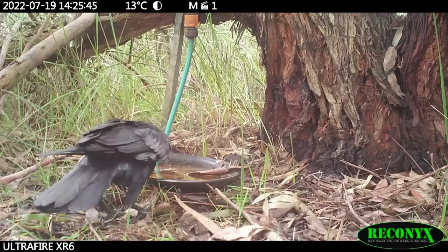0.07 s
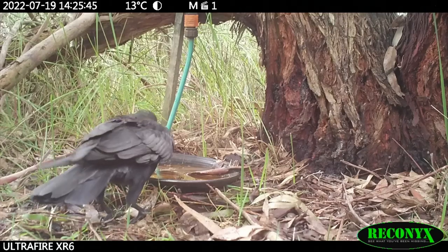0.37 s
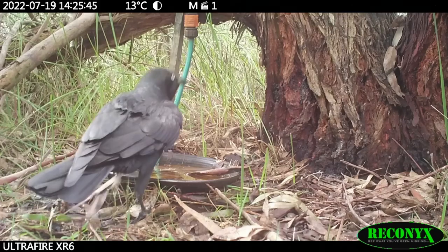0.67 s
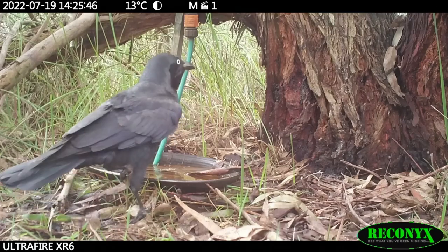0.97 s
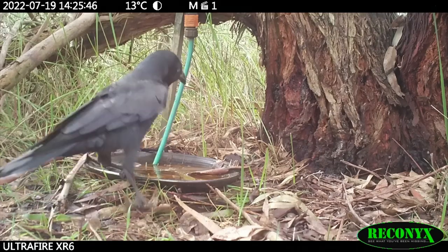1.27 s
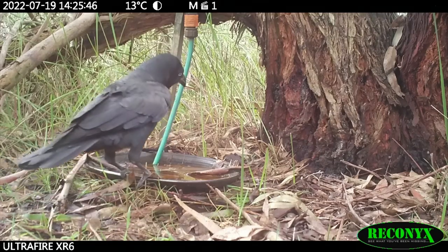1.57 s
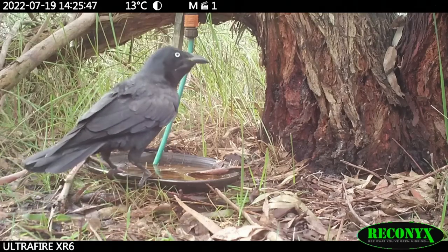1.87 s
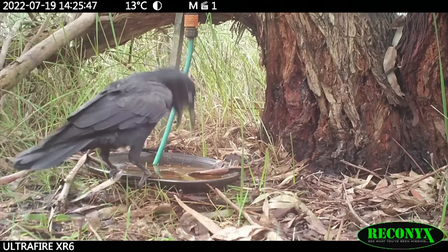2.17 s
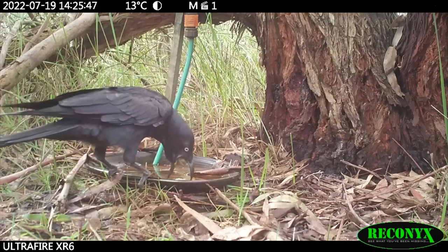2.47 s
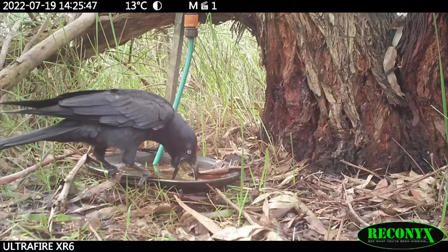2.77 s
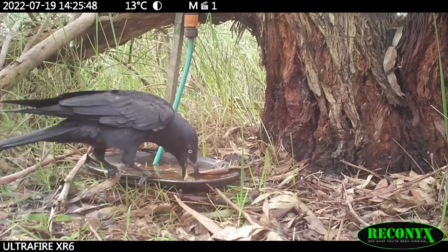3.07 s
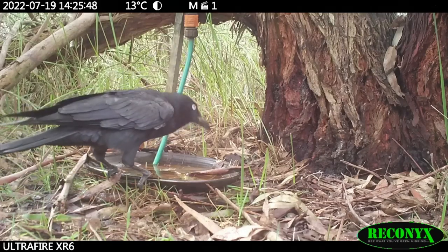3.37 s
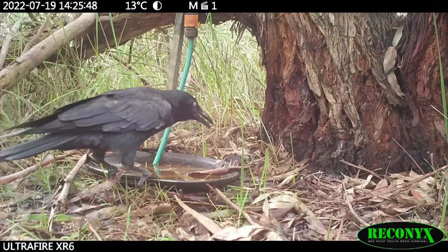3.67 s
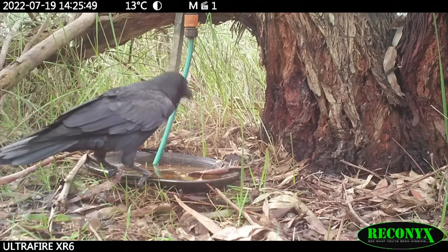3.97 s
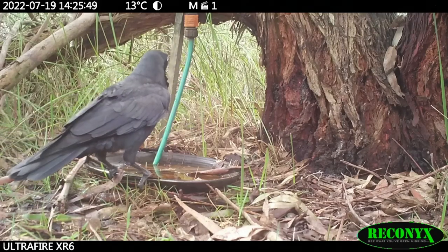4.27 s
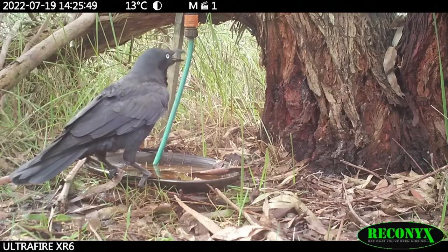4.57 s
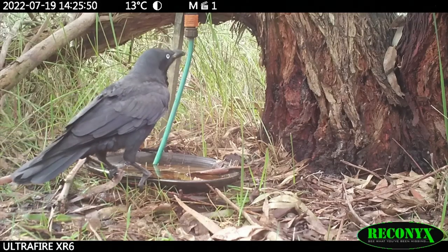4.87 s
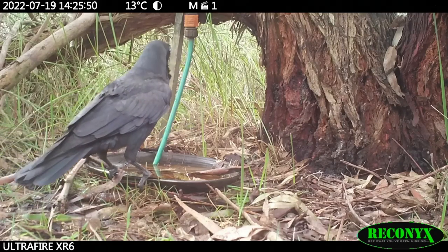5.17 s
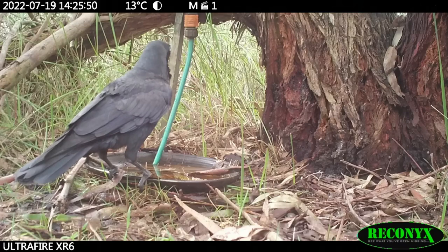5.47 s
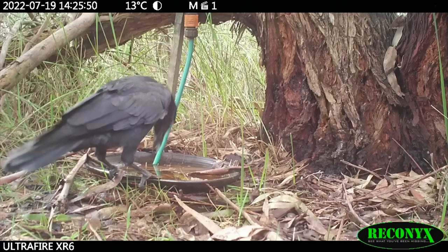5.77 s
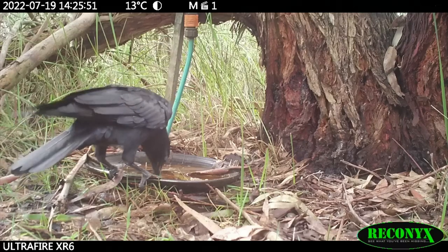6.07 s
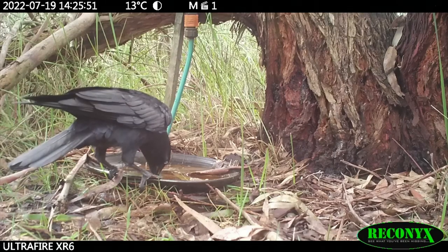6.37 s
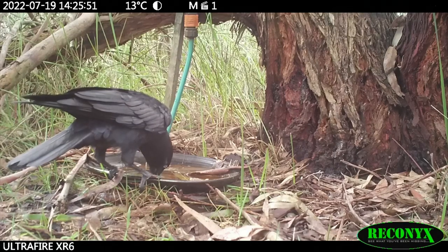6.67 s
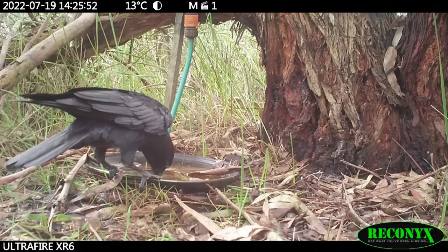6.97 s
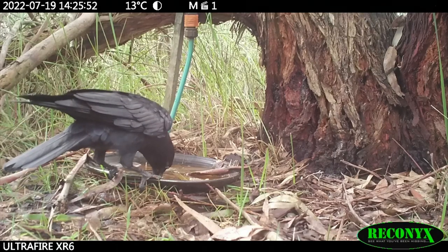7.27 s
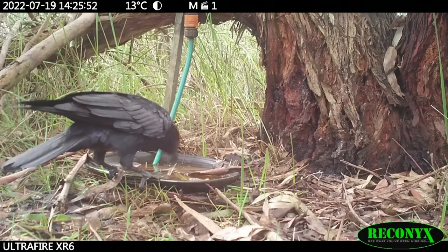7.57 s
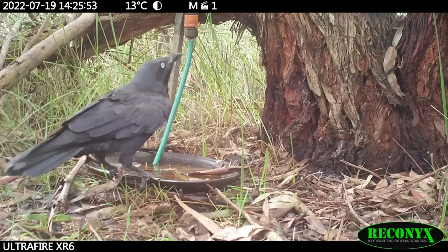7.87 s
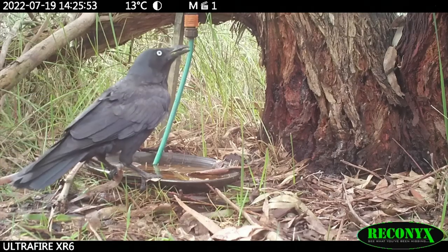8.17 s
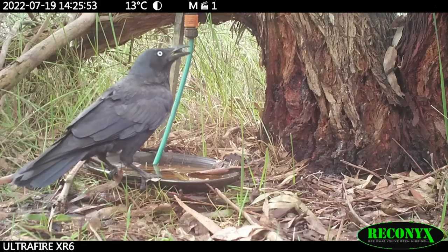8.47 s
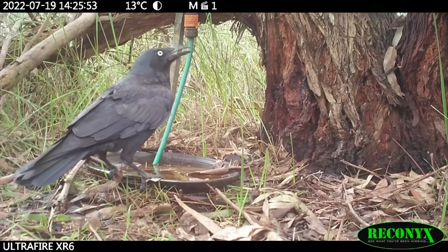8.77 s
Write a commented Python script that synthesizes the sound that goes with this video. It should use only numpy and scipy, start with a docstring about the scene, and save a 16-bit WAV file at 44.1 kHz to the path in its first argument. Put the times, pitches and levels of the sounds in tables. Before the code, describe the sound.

A large bird steps on dry leaves, snaps twigs and ruffles its feathers, while small birds chirp faintly over a soft hiss.

```python
"""Quiet bushland: a raven steps over dry leaf litter onto a water dish and shakes its head.
Twigs snap and leaves crunch in swarms of tiny fractures; claws skid and set the dish ringing.
The shake is a rustle of feathers and a few dull flaps. Small birds whistle and chip among the trees,
their tones scattered by the wood. Near the end, four soft, low stick-slip creaks sound close by.
Microphone hiss and a low rumble of far air lie under it all."""
import sys
import numpy as np
from scipy import signal
from scipy.fft import rfft, irfft, next_fast_len
from scipy.io import wavfile

SR = 44100
rng = np.random.default_rng(int(sys.argv[2]) if len(sys.argv) > 2 else 0)


def dump_mix(stems):
    """Bounce the given channels to the path in sys.argv[1] as a 16-bit WAV at rate SR."""
    frames = np.atleast_2d(stems).T  # one column per channel
    limited = np.clip(frames, -1, 1)  # hard clip at full scale
    pcm = np.round(limited * 32767).astype(np.int16)
    wavfile.write(sys.argv[1], SR, pcm)


N = 397782
TIME = np.arange(N) / SR
FFT_SIZE = next_fast_len(N)
FFT_HZ = np.arange(FFT_SIZE // 2 + 1) * SR / FFT_SIZE
RUSTLE_LIKENESS = 0.59  # left-right correlation of leaves, twigs and feathers


def from_db(db):
    """Amplitude grows tenfold with every 20 dB."""
    return 10 ** (np.asarray(db) / 20)


def at_hz(points, hz):
    """Interpolation of a table on a logarithmic frequency axis."""
    table_hz, values = np.transpose(points)
    return np.interp(np.log(hz + 1e-9), np.log(table_hz), values)


def add(track, s, sound):
    """Superposition: a short sound adds to a track from time s."""
    start = int(round(s * SR))
    part = sound[..., :N - start]
    track[..., start:start + part.shape[-1]] += part


def coloured(x, spectrum):
    """Spectral shaping: a smooth envelope weights the frequencies; the result has rms 1."""
    shaped = irfft(rfft(x, FFT_SIZE) * from_db(at_hz(spectrum, FFT_HZ)), FFT_SIZE)[..., :N]
    return shaped / np.sqrt(np.mean(shaped ** 2) + 1e-20)


def two_ears(shared, own, likeness):
    """Interaural correlation: one part reaches the ears in phase, the other in antiphase."""
    return np.sqrt((1 + likeness) / 2) * shared + np.sqrt((1 - likeness) / 2) * own * [[1], [-1]]


def grains(per_s, spread_db):
    """Shot noise: tiny impulses of uneven size arrive at random."""
    sizes = from_db(spread_db * np.minimum(rng.exponential(1, (2, N)), 4))
    signs = rng.choice([-1, 1], (2, N))
    arrivals = rng.random((2, N)) < per_s / SR
    return two_ears(*(sizes * signs * arrivals), RUSTLE_LIKENESS)


def swell_and_fade(s, db, swell_s, fade_s):
    """Exponential growth to a peak at time s, then exponential decay."""
    exponent = np.minimum((TIME - s) / swell_s, (s - TIME) / fade_s)
    return from_db(db) * np.exp(np.maximum(exponent, -30))


def resonance(x, hz, width_hz):
    """A two-pole resonator passes one band, with unit gain at its peak."""
    r, w = np.exp(-np.pi * width_hz / SR), 2 * np.pi * hz / SR
    return signal.lfilter(np.array([1, 0, -1]) * (1 - r * r) / 2, [1, -2 * r * np.cos(w), r * r], x)


def ring(force, hz, t60):
    """A damped oscillator answers each impulse with a decaying sine."""
    r, w = from_db(-60 / (t60 * SR)), 2 * np.pi * hz / SR
    return signal.lfilter([0, np.sin(w)], [1, -2 * r * np.cos(w), r * r], force + 1e-18)


def strike(modes, soft_hz, vary_db):
    """Modal response to one contact: a soft push gives little to the modes above soft_hz."""
    lowpass = signal.butter(2, soft_hz, fs=SR, output="sos")
    push = signal.sosfilt(lowpass, signal.unit_impulse(SR // 16))
    return sum(ring(push, hz, t60) * from_db(db + vary_db * rng.standard_normal())
               for hz, db, t60 in modes)


def scatter(x, t60, delay_s):
    """Diffuse reverberation: countless reflections, different at each ear, decay exponentially."""
    t = np.arange(int(1.5 * SR)) / SR
    tail = rng.standard_normal((2, len(t))) * from_db(-60 * t / t60) * (t >= delay_s)
    tail /= np.sqrt(np.sum(tail ** 2, axis=1, keepdims=True) + 1e-20)
    return signal.fftconvolve(x[None], tail, axes=1)[:, :N]


def background():
    """Noise floor: far air and microphone hiss, weakly correlated, with a thin electronic whine."""
    # rumble and hiss: (frequency [Hz], relative spectral density [dB])
    spectrum = [(20, -3.5), (35, 1), (65, -5.5), (130, -11), (250, -16.5), (450, -20.5), (700, -23),
                (1400, -26), (3500, -28.5), (5000, -29), (6500, -28.5), (8500, -32.5), (12000, -33),
                (15500, -35.5)]
    # likeness of left and right: (frequency [Hz], correlation [1])
    likeness = [(60, 0.51), (300, 0.18), (1200, 0.26), (3500, 0.027), (7000, 0.12), (14000, 0.14)]
    white = rfft(rng.standard_normal((2, FFT_SIZE)))
    ears = irfft(two_ears(*white, at_hz(likeness, FFT_HZ)), FFT_SIZE)
    whine = np.sqrt(2) * np.sin(2 * np.pi * 13486 * TIME)
    return from_db(-52) * coloured(ears, spectrum) + from_db(-87) * whine


def snaps():
    """Impulsive excitation: a snapping twig or a knocking claw gives one impulse in a brief noise burst."""
    # twigs and leaf ribs snapping, and one sharp knock of a claw on the dish (at 1.892 s):
    # (time [s], peak level [dB], resonance [Hz])
    impulses = [(0.5206, -30.5, 6500), (.5606, -36, 5860), (0.6982, -36.5, 6750), (.7118, -31, 6400),
                (1.0837, -40, 5800), (1.322, -38, 5970), (1.3592, -24, 5700), (1.729, -36, 5640),
                (1.818, -37.5, 7600), (1.892, -37.5, 2900), (2.1506, -38.5, 5240), (2.787, -41.5, 5200),
                (3.326, -47, 4200), (4.441, -40.5, 6000), (8.5646, -42, 2100), (8.966, -44, 4300)]
    burst_s, reference_db, doubling_db = 0.0085, -33, 9
    out, t = np.zeros((2, N)), np.arange(-SR // 100, SR // 25) / SR
    for s, db, hz in impulses:
        t60 = burst_s * 2 ** ((reference_db - db) / doubling_db)  # weaker ones last longer
        noise = two_ears(*rng.standard_normal((2, len(t))), RUSTLE_LIKENESS)
        burst = from_db(-60 * np.maximum(t, -2 * t) / t60)  # builds twice as fast as it dies
        force = (t == 0) + 0.4 * noise * burst
        crack = resonance(force, hz, width_hz=900) + from_db(-27) * resonance(force, 7300, width_hz=7000)
        add(out, s + t[0], from_db(db) * crack / np.abs(crack).max())
    return out


def crunches():
    """Crackling noise: each step breaks a swarm of leaf fibres; heavy ones reach the litter below."""
    # feet pressing dry leaves: (time of peak [s], level [dB], swell time [s])
    steps = [(.536, -48, 0.0063), (0.576, -49, .006), (.672, -54.5, .004), (.718, -48, .004),
             (.789, -50, 0.018), (0.821, -47.5, 0.0067), (1.151, -52.5, 0.015), (1.262, -41.5, 0.027),
             (1.366, -42, 0.021), (1.436, -44.5, 0.019), (1.725, -53, .005), (7.155, -58, .008),
             (8.662, -56.5, .006)]
    # crisp top leaves: (frequency [Hz], relative spectral density [dB])
    leaf = [(500, -42), (2500, -16), (3600, -17.5), (4600, -5), (5400, 0.5), (6000, -3), (6700, 0),
            (7500, -5), (8200, -7.5), (9300, -13), (12000, -18.5), (15500, -23)]
    # duller litter beneath: (frequency [Hz], relative spectral density [dB])
    litter = [(150, -12), (500, -2), (1400, 0), (2300, 0.5), (3500, 1), (5000, -10), (9000, -7),
              (15500, -7)]
    # soft ground: (frequency [Hz], relative spectral density [dB])
    soil = [(40, -5), (150, 0), (400, -10), (1500, -23), (5000, -50)]
    power = np.zeros(N)
    for s, db, swell_s in steps:
        tread = swell_and_fade(s, db, swell_s, fade_s=0.015)
        settling = swell_and_fade(s, db - 13, swell_s, fade_s=0.058)  # bent leaves come to rest
        power += tread ** 2 + settling ** 2
    press = np.sqrt(power)
    depth = np.sqrt(press / press.max())
    crisp = coloured(grains(per_s=1200, spread_db=1.5), leaf)
    deep = from_db(-8) * depth * coloured(grains(per_s=2000, spread_db=4), litter)
    ground = from_db(-16.5) * coloured(grains(per_s=3000, spread_db=1), soil)
    return press * (crisp + deep + ground)


def claws():
    """Frictional excitation: claws skid on the rim and drive the short, thin ring of the dish."""
    # claws on the rim: (time [s], strength [dB], skid t60 [s])
    skids = [(1.836, -43, .002), (1.8361, -42.5, 0.013), (1.8384, -39.5, 0.028), (1.8918, -43, 0.0033)]
    # modes of the dish: (frequency [Hz], relative level [dB], t60 [s])
    dish_modes = [(2970, -11.5, 0.042), (3300, -21, 0.018), (3750, -11, 0.017), (5070, -4, 0.022),
                  (5700, -8, 0.011), (6080, -1.5, 0.011), (6650, 2, 0.014), (7100, -8, .011),
                  (7550, -5, 0.015), (8500, -2, .007), (9600, 1, 0.0076), (11300, 0, 0.01),
                  (12300, -17, .008)]
    out, t = np.zeros((2, N)), np.arange(SR // 50) / SR
    for s, db, t60 in skids:
        force = two_ears(*rng.standard_normal((2, len(t))), likeness=0.65) * from_db(-60 * t / t60)
        force /= np.linalg.norm(force[0])
        dish = strike(dish_modes, soft_hz=9100, vary_db=2)
        add(out, s, from_db(db) * signal.fftconvolve(force, dish[None], axes=1))
    return signal.sosfilt(signal.butter(2, 2000, "high", fs=SR, output="sos"), out + 1e-18)


def ruffle():
    """Friction noise: feathers brush over each other while the head is shaken."""
    # soft feather noise: (frequency [Hz], relative spectral density [dB])
    feather = [(100, 3), (600, 0), (1800, -8), (3500, -12), (6500, -3.5), (9000, -16), (15500, -22)]
    level = swell_and_fade(s=2.27, db=-56.5, swell_s=0.11, fade_s=0.12)
    return level * coloured(grains(per_s=2500, spread_db=3), feather)


def flaps():
    """Damped impacts: the shake gives about twenty dull flaps a second, the harder the brighter."""
    # flaps of the shaken head: (time [s], strength [dB])
    impacts = [(2.256, -38.5), (2.2763, -38), (2.3350, -36), (2.3839, -34), (2.432, -36.5)]
    # modes of a flap: (frequency [Hz], relative level [dB], t60 [s])
    modes = [(630, -7, 0.0097), (1010, -4.5, 0.0053), (1400, -12, 0.0058), (1900, -3.5, 0.016),
             (2480, -14, .01), (4230, -6, 0.0034), (6130, -3, 0.0072)]
    brightest_hz, db_per_octave = 4500, 2
    out, hardest_db = np.zeros(N), max(db for s, db in impacts)
    for s, db in impacts:
        soft_hz = brightest_hz * 2 ** ((db - hardest_db) / db_per_octave)
        add(out, s, from_db(db) * strike(modes, soft_hz, vary_db=1))
    return out


def songbirds():
    """Frequency modulation: nearly pure tones glide along the contour of each call, wavering slightly."""
    # contours of the calls: (share of length [1], pitch ratio [1], relative level [dB])
    whistle = [(0, .80, -26), (.1, .845, -4), (.25, .86, -3), (.42, .95, 0.5), (.57, 1.015, 6),
               (.75, .985, 6.5), (.86, 1.0, 13), (1, 1.13, -8)]  # rising
    chip = [(0, .76, -7), (.25, .87, 1), (.5, .96, 5), (.75, 1.01, -3), (1, 1.02, 1)]  # quick and upward
    slur = [(0, .70, -4), (.2, .76, 0), (.38, .85, 4.5), (.62, 0.97, -5), (.73, .99, 0), (.85, .82, 1),
            (1, .80, 7)]  # up and down again
    warble = [(0, .86, -2), (.22, 1.03, 4), (.4, .9, -2), (.55, .66, -1), (.7, .82, -6), (.85, 1.0, -5),
              (1, 0.92, -8)]  # low and wavy
    # calls sung to each contour: (time [s], length [s], pitch [Hz], level [dB])
    whistles = [(6.814, 0.098, 6580, -61.5), (7.731, 0.11, 6360, -54), (8.903, .108, 6630, -63.5)]
    chips = [(3.628, 0.034, 6920, -54), (5.202, 0.047, 6700, -63.5), (7.364, .036, 6980, -54.5)]
    slurs = [(2.455, .035, 3970, -66.5), (5.946, 0.07, 6530, -56.5), (8.94, .04, 2940, -64.5),
             (8.962, .04, 5750, -66)]
    warbles = [(2.881, .068, 3540, -59.5)]
    # each chip has a second voice, higher, shorter and softer
    upper = [(s + 0.1 * length, 0.76 * length, 1.15 * hz, db - 4) for s, length, hz, db in chips]
    out = np.zeros(N)
    for contour, calls in ((whistle, whistles), (chip, chips + upper), (slur, slurs), (warble, warbles)):
        share, ratio, contour_db = np.transpose(contour)
        for s, length, hz, db in calls:
            progress = np.linspace(0, 1, int(length * SR))
            waver = 0.008 * np.interp(progress, np.linspace(0, 1, 24), rng.standard_normal(24))
            pitch = hz * np.interp(progress, share, ratio) * (1 + waver)
            tone = np.sqrt(2) * np.sin(2 * np.pi * np.cumsum(pitch) / SR)
            level = from_db(db + np.interp(progress, share, contour_db))
            add(out, s, level * signal.windows.tukey(len(tone), 0.15) * tone)
    return out


def creaks():
    """Stick-slip friction: something close by slips unevenly, strongest near the middle of each run."""
    # runs of slips: (time [s], length [s], strength [dB], slip rate [1/s], contact cutoff [Hz])
    runs = [(8.069, 0.033, -42.5, 236, 1350), (8.313, 0.03, -44, 167, 1900),
            (8.621, 0.011, -43.5, 130, 2300), (8.6375, 0.018, -45.5, 290, 2000),
            (8.852, 0.033, -46.5, 260, 1100)]
    # modes rung by a slip: (frequency [Hz], relative level [dB], t60 [s])
    modes = [(352, -5.5, 0.011), (465, 1, 0.016), (598, -5, 0.011), (1020, -5, 0.012), (1560, -10, 0.013),
             (1960, -6.5, .009)]
    out, jitter = np.zeros(N), 0.2
    for s, length, db, per_s, soft_hz in runs:
        gaps = np.exp(jitter * rng.standard_normal(16)) / per_s
        slips = np.cumsum(gaps) - gaps[0]
        sounds = [strike(modes, soft_hz, vary_db=2.5) for slip in slips]
        for slip, sound in zip(slips, sounds):
            if slip < length:
                fade_db = 14 * (slip / length - 0.4) ** 2
                add(out, s + slip, from_db(db - fade_db) * sound)
    return signal.sosfilt(signal.butter(2, [220, 2800], "band", fs=SR, output="sos"), out + 1e-18)


def scene():
    """Direct-to-reverberant ratio: near sounds echo faintly; far calls arrive mostly scattered."""
    feet = snaps() + crunches() + claws()
    trees = from_db(-15) * scatter(feet.mean(axis=0), t60=0.3, delay_s=0.008)
    close = flaps() + creaks()
    close = close + from_db(-15) * scatter(close, t60=0.14, delay_s=0.0024)
    calls = songbirds()
    direct = np.stack([np.roll(calls, 7), calls])  # birds on the right: the left ear hears them later
    early = from_db(0.5) * scatter(calls, t60=0.18, delay_s=0.003)
    late = from_db(-2.5) * scatter(calls, t60=0.73, delay_s=0.018)
    far = from_db(-2.5) * direct + early + late
    lean_right = from_db([[-0.4], [0.4]])
    return (feet + trees + far) * lean_right + close + ruffle() + background()


def record(dry):
    """Offset and band limit: the microphone wakes after 0.1 s, the converter rests off zero and the recorder
    cuts the top."""
    # resting value of the converter, left then right: (offset [full scale])
    offset = [
        [-.0395],
        [-.0245],
    ]
    awake = np.clip((TIME - 0.085) / 0.035, 0, 1)
    fade_in = np.sin(np.pi / 2 * awake) ** 2
    lowpass = signal.ellip(12, 0.1, 80, 15400, fs=SR, output="sos")
    return signal.sosfilt(lowpass, (dry + offset) * fade_in)


dry = scene()
out = record(dry)
dump_mix(out)
```